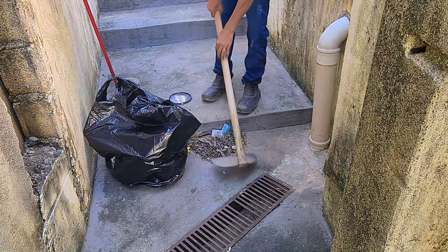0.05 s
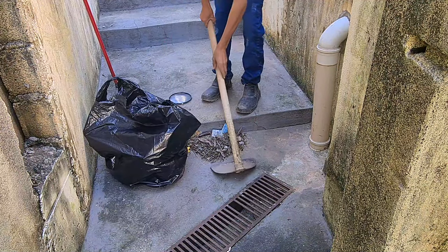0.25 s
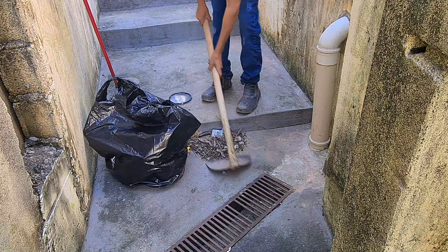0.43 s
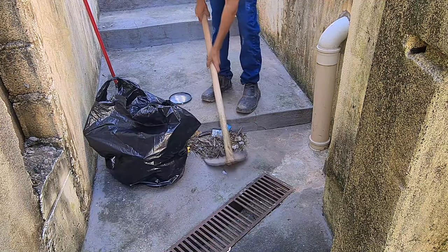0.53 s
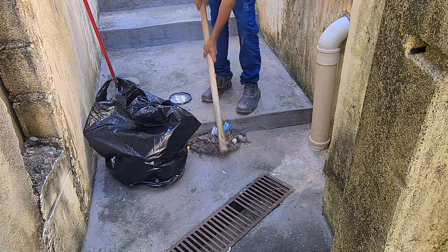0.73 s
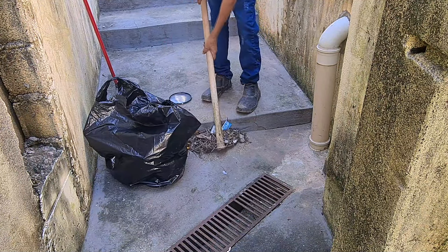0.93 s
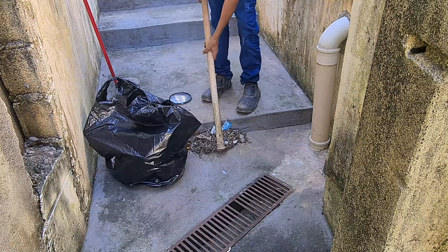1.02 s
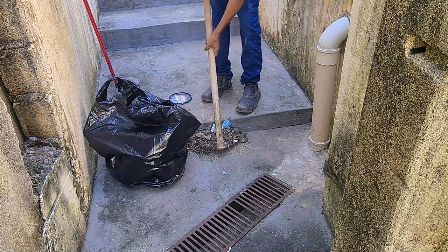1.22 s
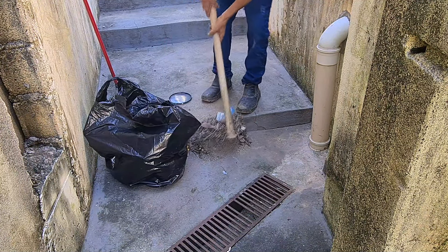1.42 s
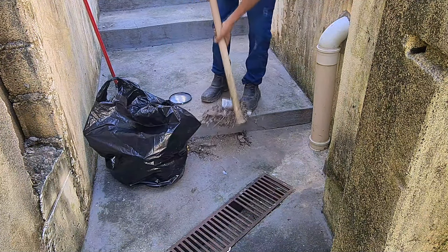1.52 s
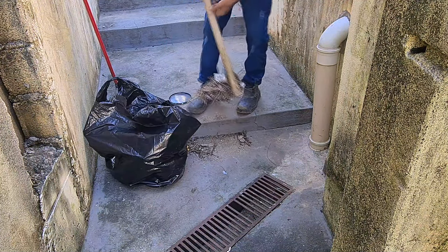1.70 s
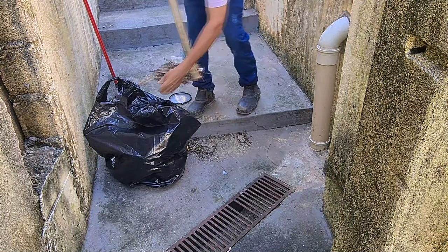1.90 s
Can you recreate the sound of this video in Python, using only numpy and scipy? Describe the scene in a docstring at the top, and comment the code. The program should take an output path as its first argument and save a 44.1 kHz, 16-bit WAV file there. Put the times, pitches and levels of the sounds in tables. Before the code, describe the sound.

A steel hoe scrapes once over concrete in a narrow outdoor passage with a short echo. After faint wooden knocks, the blade lands at 0.2 seconds and bounces with sharp clanks. The gritty, ringing drag builds from 0.3 seconds, is loudest from 0.5 to 0.8, and fades by 0.9. Dry debris clicks near 1.2 seconds, then a few times more faintly. Soft hiss and low microphone wind continue throughout.

```python
"""Low wind buffets the microphones over a soft hiss, with dull knocks, likely a wooden handle.
A steel hoe is set down on concrete in a narrow walled passage, bounces, and is dragged once into
a heap of leaves. Grit slipping under the edge rasps and rings the blade; the walls answer.
Debris clicks as the leaves settle."""
import sys
import numpy as np
from scipy import signal
from scipy.fft import rfft, irfft
from scipy.io import wavfile

SR = 44100
rng = np.random.default_rng(int(sys.argv[2]) if len(sys.argv) > 2 else 0)


def put_to_file(sound):
    """Save the sound as 16-bit audio at rate SR, in the file named by the first command-line argument."""
    columns = np.atleast_2d(sound).T  # one column per channel
    safe = np.clip(columns, -1, 1)
    whole_steps = np.round(safe * 32767)
    wavfile.write(sys.argv[1], SR, whole_steps.astype(np.int16))


N = 85995
TIME_S, BINS_HZ = np.arange(N) / SR, np.fft.rfftfreq(N, 1 / SR)


def amp(db):
    return 10 ** (np.asarray(db) / 20)


def unit_rms(x):
    return x / np.sqrt(np.mean(x ** 2) + 1e-20)


def at_hz(points, hz):
    """Glides between table rows along log frequency."""
    freq_hz, value = np.transpose(points)
    return np.interp(np.log(hz + 1), np.log(freq_hz + 1), value)


def automation(rows, column=1):
    """Glides between table rows over time."""
    rows = np.array(rows)
    return np.interp(TIME_S, rows[:, 0], rows[:, column])


def equalise(x, points):
    """Minimum-phase EQ that keeps the power of white noise."""
    log_gain = at_hz(points, abs(np.fft.fftfreq(4096, 1 / SR))) * np.log(10) / 20
    taps = np.fft.ifft(np.exp(np.conj(signal.hilbert(log_gain)))).real[:2048]
    taps = (taps / np.linalg.norm(taps)).reshape((1,) * (x.ndim - 1) + (-1,))
    return signal.oaconvolve(x, taps, axes=-1)[..., :N]


def flutter(rate_hz):
    """Random wobble of unit spread around the given rate."""
    ratio = BINS_HZ / rate_hz
    return unit_rms(irfft(rfft(rng.standard_normal(N)) * np.sqrt(ratio) * np.exp(-ratio ** 2), N))


def stereo(a, b, likeness, pan):
    """Two signals become left and right, with width and balance set by frequency."""
    hz = np.fft.rfftfreq(len(a), 1 / SR)
    same, tilt = np.clip(at_hz(likeness, hz), 0, 1), amp(at_hz(pan, hz) / 2)
    left = rfft(a)
    right = same * left + np.sqrt(1 - same ** 2) * rfft(b)
    return irfft(np.array([left * tilt, right / tilt]), len(a))


def burst(start_s, level_db, decay_s):
    """Envelope of a sudden contact dying away."""
    age_s = TIME_S - start_s
    return amp(level_db) * (age_s >= 0) * np.exp(-np.maximum(age_s, 0) / decay_s)


# Tone of the rumble: freq_hz, gain_db
WIND_EQ = [(8.8, -56), (15, -0.5), (38, -3.5), (63, 2.5), (86, -4.5), (119, -10.5), (189, -14.5),
           (275, -31.5), (300, -72.5), (390, -70), (660, -120)]
# Gusts swelling and dropping: time_s, level_db
GUSTS = [(0.0, -49), (0.124, -50), (0.14, -54), (0.162, -38.5), (0.222, -58), (0.39, -47), (0.406, -34),
         (0.612, -39), (0.634, -30), (0.868, -45.5), (0.944, -34.5), (0.972, -40.5), (1.032, -38),
         (1.194, -36.5), (1.226, -29.5), (1.254, -40.5), (1.596, -48.5), (1.606, -55), (1.644, -36),
         (1.694, -41), (1.71, -43), (1.748, -38), (1.78, -48), (1.89, -42.5), (1.922, -52), (1.95, -49)]


def wind(likeness=0.74, pan_right_db=2.5):
    """Gusts buffet the microphone ports with a lumpy rumble."""
    tone = amp(np.where(BINS_HZ > 600, -79, at_hz(WIND_EQ, BINS_HZ)))
    left, other = irfft(rfft(rng.standard_normal((2, N))) * tone, N)
    right = likeness * left + np.sqrt(1 - likeness ** 2) * other
    balance = amp([[-pan_right_db / 2], [pan_right_db / 2]])
    return amp(automation(GUSTS)) * unit_rms(np.array([left, right])) * balance


# Tone of the hiss: freq_hz, gain_db
HISS_EQ = [(88, -19.5), (150, -8), (254, -10), (492, -12), (820, -16), (2040, -20), (3500, -21),
           (5100, -22.5), (7300, -24), (8000, -29), (12000, -29.5), (15800, -28)]
# Its fader ride: time_s, level_db
HISS_FADER = [(0, -50), (.19, -51), (1.0, -51.5), (1.15, -48.5), (1.3, -51.5), (1.42, -52.5), (1.5, -53),
              (1.57, -51), (1.66, -54), (1.95, -53.5)]
# Its width, opening toward the treble: freq_hz, left_right_likeness
HISS_LIKENESS = [(60, 0.8), (180, 0.88), (550, 0.9), (1650, 0.85), (4970, 0.58), (15000, 0.54)]
# Its balance: freq_hz, left_minus_right_db
HISS_PAN = [(60, -8), (240, 1), (950, 0.5), (3770, -2.5), (15000, -1.0)]


def hiss():
    """A soft bed of distant hiss and settling leaves, thinning toward the end."""
    a, b = equalise(rng.standard_normal((2, N)), HISS_EQ)
    return amp(automation(HISS_FADER) + flutter(rate_hz=30)) * stereo(a, b, HISS_LIKENESS, HISS_PAN)


# Dull, woody knocks: start_s, level_db, pitch_hz, t60_s
KNOCKS = [(.056, -43, 405, 0.13), (0.057, -41.5, 660, 0.051), (0.093, -50, 430, .08),
          (0.216, -46.5, 240, .14), (0.3, -38, 268, .1), (0.361, -42, 258, 0.11)]


def knocks():
    """Each knock, likely the wooden handle, rings one low damped tone."""
    return sum(burst(start_s, db, t60_s / np.log(1000)) * np.sin(2 * np.pi * hz * (TIME_S - start_s))
               for start_s, db, hz, t60_s in KNOCKS)


def grit_slips(slips_per_s=7000, spread_db=4, bass_hz=2500, treble_hz=7600):
    """Grit slips under the edge in tiny random jolts: full band, bass only and treble only."""
    strength = amp(spread_db * np.minimum(rng.exponential(1, N), 3))
    polarity = rng.choice([-1, 1], N)
    slipping = rng.random(N) < slips_per_s / SR
    jolts = unit_rms(strength * polarity * slipping)
    low_pass = 1 / (1 + (BINS_HZ / bass_hz) ** 6)
    high_pass = 1 - 1 / (1 + (BINS_HZ / treble_hz) ** 12)
    bass, treble = irfft(rfft(jolts) * np.array([low_pass, high_pass]), N)
    return jolts, bass, treble


def shelve(slips, bass_db, treble_db):
    """Bass and treble shelves on the slips."""
    jolts, bass, treble = slips
    return jolts + (amp(bass_db) - 1) * bass + (amp(treble_db) - 1) * treble


# The blade lands and bounces: start_s, level_db, bass_db, treble_db, skid_decay_s
BLOWS = [(0.2016, -13.5, -4, -1.5, 0.0034), (0.22, -17.5, -5.5, 2, 0.014), (.3015, -16, -2, -6.5, 0.0044),
         (0.3526, -22, 2.5, 3.5, 0.0051), (.4595, -15.5, -7, -6, 0.0073)]


def blade_blows(slips, tap_boost_db=11.5, tap_decay_s=0.00004):
    """Each blow on the concrete is one sharp tap and a short gritty skid."""
    return sum(burst(start_s, db, skid_s) * shelve(slips, bass_db, treble_db)
               + burst(start_s, db + tap_boost_db, tap_decay_s)
               for start_s, db, bass_db, treble_db, skid_s in BLOWS)


# The scraping stroke: time_s, level_db, bass_db, treble_db
DRAG = [(.29, -50, 4, -4), (.33, -33.5, 5.5, -5), (.38, -30.5, 5, 2.5), (.42, -27, 4.5, -9),
        (.45, -21.5, -1, 3.5), (.485, -24.5, -5.5, 4), (.512, -15.5, 1.5, 1.5), (.535, -23.5, 0, 6.5),
        (.55, -18, 0, 6), (.565, -18.5, 3.5, 7), (.58, -16.5, -1, 1), (.6, -22.5, 3.5, 3.5),
        (.65, -18, 0, 1), (.685, -19, 4.5, 1.5), (.72, -18.5, -2, 0.5), (.745, -22, 5, 7.5),
        (.757, -17.5, -7.5, 0), (.79, -24.5, 2.5, 1.5), (.85, -31, 2.5, 0.5), (.92, -50, 6.5, -6),
        (.99, -60.5, -6, 9)]


def blade_drag(slips, judder_hz=49.6, judder_db=2, gate_db=-50):
    """The edge judders over the floor in one pull."""
    level_db = automation(DRAG)
    force = amp(level_db + judder_db * flutter(judder_hz)) * (level_db > gate_db)
    return force * shelve(slips, automation(DRAG, column=2), automation(DRAG, column=3))


# Steel modes, each swelling when the contact favours it: pitch_hz, swell_time_s, bend_share
BLADE_MODES = [(200, .68, 0), (405, .62, 0), (1050, .45, 1), (1466, .76, 0), (1805, .66, 0),
               (2010, .65, .5), (2981, .5, 0), (3279, .76, 0), (3830, .45, 0), (4187, .6, 0),
               (4890, .65, 0), (5595, .71, 0), (6440, .52, 0), (6655, .57, 0), (7330, .55, 0),
               (7901, .76, 0), (10130, .56, 0), (12250, .5, 0), (13800, .48, 0)]
# Voicing of the same modes: width_hz, dragged_db, struck_db, swell_db
BLADE_VOICING = [(60, -19, -16, 1.5), (11.8, -14, -12, 6.5), (19.6, -6, 5, 13.5), (10, -11.5, 1.5, 13),
                 (15, -22, -6, 5), (40, -5.5, -8, 3), (29.4, -20, -18, 10), (45, -2, -9, 6.5),
                 (38.3, -6, 2.5, 15), (40.3, -12.5, -10, 6.5), (65, -1, 1, 0), (50, -1.5, -7, 7.5),
                 (96, -8, 1, 1), (45, -6, 0.5, 9), (89, -5, 4, 8.5), (40, -20, -22, 14),
                 (58, -16.5, -17, 5), (90, -16, -7, 2), (120, -12, -20, 3)]
# Pressing the blade bends some low modes: time_s, pitch_ratio
BLADE_BEND = [(.3, 1.027), (.42, .98), (.54, 1.0), (.6, .97), (.7, .99), (.8, 1.03), (.9, 1.055)]


def blade_ring(blows, drag, swell_width_s=0.066, skip_hz=28.5, skip_db=5.5):
    """Blows and drag ring the steel; the dragged edge skips, so each mode flickers on its own."""
    bend = automation(BLADE_BEND)
    ring = np.zeros(N)
    for mode, voicing in zip(BLADE_MODES, BLADE_VOICING):
        pitch_hz, swell_time_s, bend_share = mode
        width_hz, dragged_db, struck_db, swell_db = voicing
        swell = np.exp(-((TIME_S - swell_time_s) / swell_width_s) ** 2)
        drive = amp(struck_db) * blows
        drive += drag * amp(dragged_db + swell_db * swell + skip_db * flutter(skip_hz))
        carrier = np.exp(2j * np.pi * np.cumsum(pitch_hz * bend ** bend_share) / SR)
        pole = np.exp(-np.pi * width_hz / SR)
        gain = np.sqrt(2 * (1 - pole ** 2))  # equal noise power at any width
        ring += (carrier * signal.lfilter([gain], [1, -pole], drive / carrier)).imag
    return ring


# Broad rasp of the edge: freq_hz, gain_db
RASP_EQ = [(90, -39), (180, -13.5), (320, -33), (480, -8), (700, -6), (1000, -1), (1330, -8.5), (1900, 0.5),
           (2400, -6), (3300, -1), (5000, -2), (6400, -0.5), (7400, -4), (8200, -8), (11000, -9),
           (13800, -8), (15800, -16)]


def hoe(rasp_gain_db=1, ring_gain_db=-14):
    """The same slips feed the rasp of the edge and the ring of the blade."""
    slips = grit_slips()
    blows, drag = blade_blows(slips), blade_drag(slips)
    rasp = equalise(drag + amp(-0.5) * blows, RASP_EQ)
    return amp(rasp_gain_db) * rasp + amp(ring_gain_db) * blade_ring(blows, drag)


# Clicks after the drag: start_s, level_db, decay_s
CLICKS = [(1.1735, -28, 0.005), (1.198, -48, .005), (1.274, -51, 0.0056), (1.339, -45, 0.0043),
          (1.636, -69, .003), (1.711, -48, .004)]
# Their crisp tone: freq_hz, gain_db
CLICK_EQ = [(400, -47), (800, -20), (1050, 2), (1600, 0), (3600, 0), (5200, -5), (6900, 1.5), (8200, -11),
            (13500, -9), (15800, -20)]


def debris_clicks():
    """Shifting debris gives off tiny snaps of noise."""
    return equalise(sum(burst(*click) for click in CLICKS) * rng.standard_normal(N), CLICK_EQ)


# Reverb tail of the passage: freq_hz, t60_s
WALL_DECAY = [(200, 0.55), (1000, 0.49), (4000, 0.52), (7000, 0.44), (9000, 0.39), (15000, 0.28)]
# Its width, narrow lows and wide highs: freq_hz, left_right_likeness
WALL_LIKENESS = [(60, 0.78), (180, 1), (550, 0.83), (1650, 0.35), (4970, 0.079), (15000, 0.042)]
# Its balance: freq_hz, left_minus_right_db
WALL_PAN = [(60, -2), (180, 2), (550, 1), (1650, -1.0), (4970, -4), (15000, -0.5)]


def wall_response(first_echo_s=0.002, early_t60_s=0.043, late_db=-10.5):
    """Direct sound, then dense echoes: the near walls answer at once, the passage lingers."""
    length = SR // 2
    taps = np.zeros((2, length))
    slots = np.arange(round(first_echo_s * SR), length - 16, 16)
    arrivals = slots + rng.integers(0, 16, (2, len(slots)))
    np.put_along_axis(taps, arrivals, rng.choice([-1., 1.], arrivals.shape), 1)
    hz, t, bands = signal.stft(taps, SR, nperseg=128)
    fade = amp(-60 * t / early_t60_s) + amp(late_db - 60 * t / at_hz(WALL_DECAY, hz)[:, None])
    tail = signal.istft(bands * fade, SR, nperseg=128)[1][:, :length]
    tail[:, :slots[0]] = 0
    response = stereo(*tail, WALL_LIKENESS, WALL_PAN) / np.linalg.norm(tail[0])
    # The direct sound is louder and a touch later on the right.
    right_lag_s = rng.uniform(0.0001, 0.0005)
    response[0, 0] += amp(-6)
    response[1, round(right_lag_s * SR)] += amp(-3)
    return response


def passage(x, crossfade_s=0.1099):
    """The blade moves on, so its echoes take new paths: six responses crossfade in a cycle."""
    step = TIME_S / crossfade_s
    fades = [np.cos(np.pi / 2 * np.clip((step - k + 3) % 6 - 3, -1, 1)) for k in range(6)]
    return sum(signal.fftconvolve((fade * x)[None], wall_response(), axes=1)[:, :N] for fade in fades)


def scene():
    """Knocks, hoe and debris echo in the passage; hiss and wind stay dry."""
    return passage(knocks() + hoe() + debris_clicks()) + hiss() + wind()


def record(dry, knee=0.65, headroom=0.25, cutoff_hz=15760):
    """Soft-clips any peaks above the knee, then cuts the top treble."""
    over = np.maximum(abs(dry) - knee, 0)
    soft = dry - np.sign(dry) * (over - headroom * np.tanh(over / headroom))
    low_pass = signal.firwin(767, cutoff_hz, window=("kaiser", 11), fs=SR)
    return signal.oaconvolve(soft, low_pass[None], "same")


dry = scene()
out = record(dry)
put_to_file(out)
```